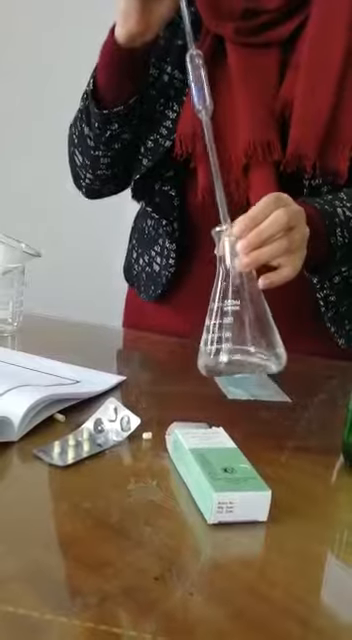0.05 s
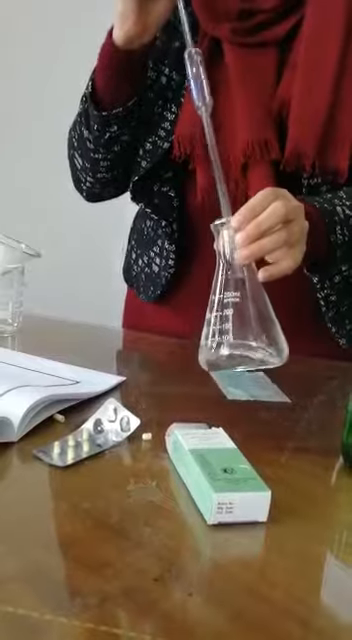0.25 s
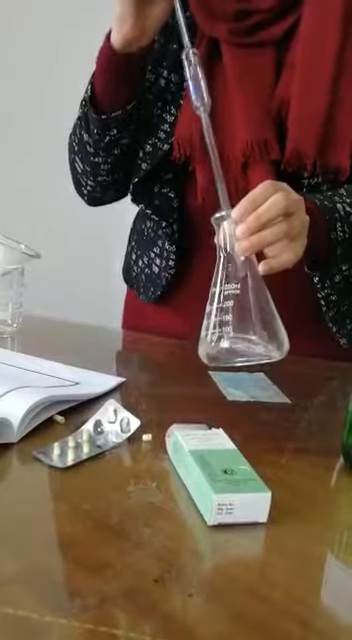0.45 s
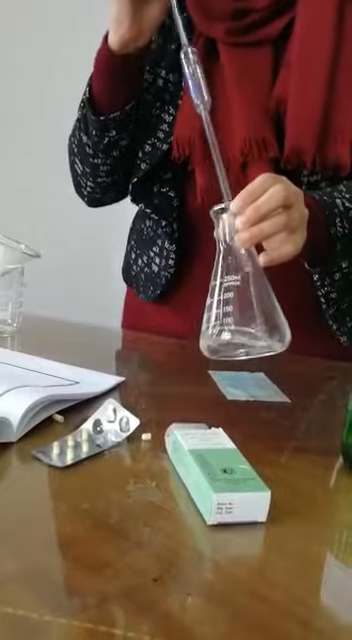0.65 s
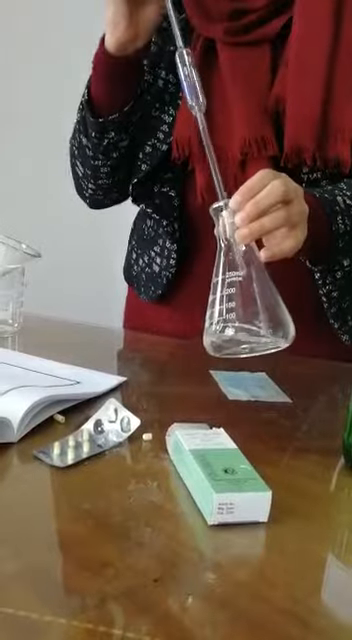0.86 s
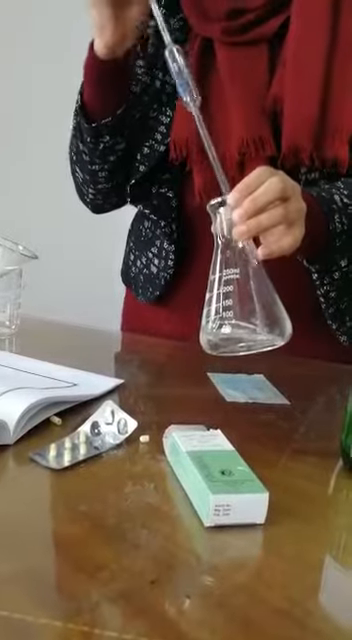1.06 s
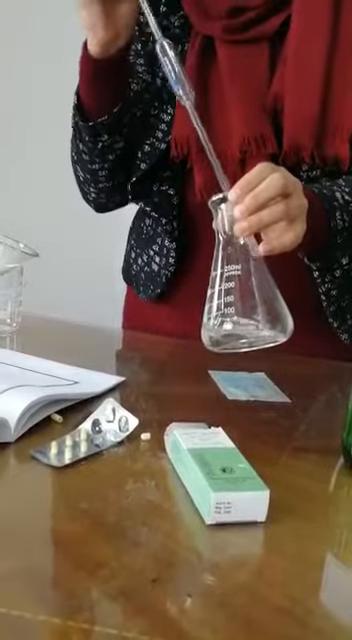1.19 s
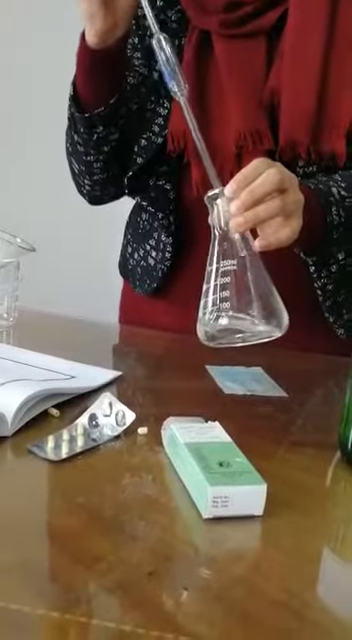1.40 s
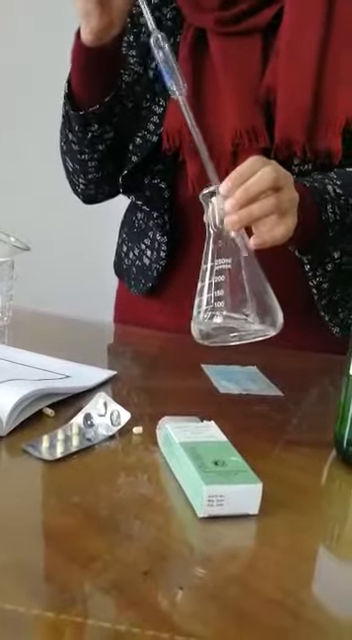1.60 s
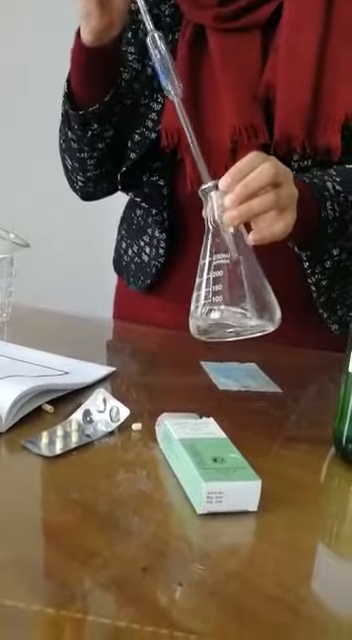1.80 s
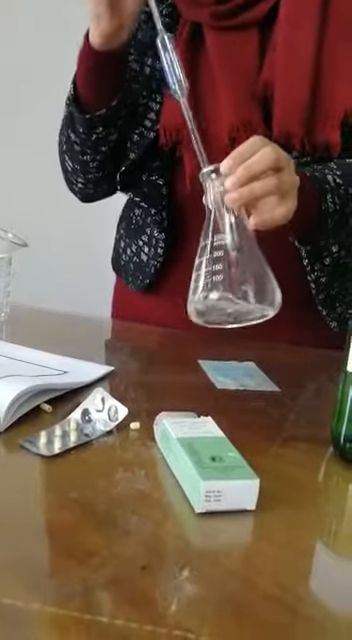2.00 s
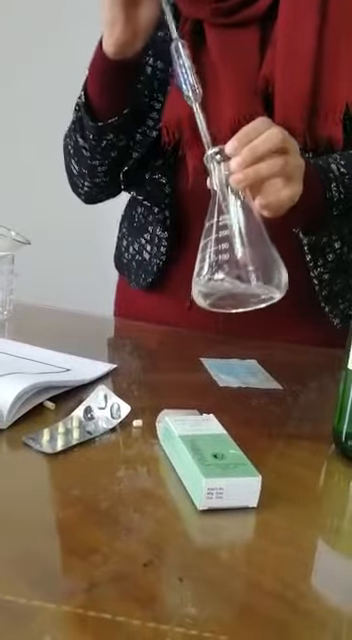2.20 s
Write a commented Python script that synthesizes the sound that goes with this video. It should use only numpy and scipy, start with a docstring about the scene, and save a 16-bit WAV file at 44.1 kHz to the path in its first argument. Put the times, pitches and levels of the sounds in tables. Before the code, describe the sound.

Close to the microphone, a glass pipette taps irregularly inside a glass flask after a light scrape. Each high clink rings briefly in a small lab, with faint hisses between them and ventilation humming underneath.

```python
"""A low ventilation hum fills a small lab. A glass pipette scrapes lightly in the neck of a hand-held
flask, close to a phone, and soft hisses start to come and go. Then the pipette knocks about: each contact
chatters for a moment and rings both glasses, the pipette's pitch shifting with where it touches.
The room answers every clink with a short tail."""
import sys
import numpy as np
from scipy import signal
from scipy.fft import rfft, irfft, next_fast_len
from scipy.io import wavfile

SR = 44100
rng = np.random.default_rng(int(sys.argv[2]) if len(sys.argv) > 2 else 0)


def store_pcm(level_fs):
    """Save levels as 16-bit WAV."""
    pcm = np.round(np.clip(level_fs, -1, 1) * 32767).astype(np.int16)
    wavfile.write(sys.argv[1], SR, np.atleast_2d(pcm).T)


N = 99225


def undb(db):
    """Decibels to gain."""
    return 10 ** (np.asarray(db) / 20)


def unit(x):
    """Scale to rms 1."""
    return x / np.sqrt(np.mean(x ** 2) + 1e-18)


def colour(x, points):
    """Minimum-phase EQ through (freq_hz, gain_db) points."""
    hz, db = np.array(points, float).T
    size = 2 * next_fast_len(len(x) // 2 + 1024)
    f = np.maximum(np.arange(size // 2 + 1) * SR / size, 1)
    gain = undb(np.interp(np.log(f), np.log(np.sort(hz)), db))
    cepstrum = irfft(np.log(gain))
    cepstrum[1:size // 2] *= 2
    cepstrum[size // 2 + 1:] = 0
    return irfft(rfft(x, size) * np.exp(rfft(cepstrum)))[:len(x)]


def fade(t, t60):
    """Hold at 1 until t = 0, then fall 60 dB every t60 seconds."""
    return np.exp(-np.log(1000) * np.maximum(t, 0) / t60)


def late(x, delay_s):
    """Delay a sound on the scene's time line."""
    return np.pad(x, (max(int(delay_s * SR), 0), N))[:N]


def swell(peak_s, length_s):
    """A bell-shaped rise and fall."""
    return np.exp(-2 * ((np.arange(N) / SR - peak_s) / length_s) ** 2)


def ventilation():
    """Low rumble and hum, much alike on both sides, under a thin diffuse hiss."""
    # tone of the moving air: freq_hz, gain_db
    air_eq = [(15, 3.5), (25, -31), (59, -16.5), (111, 1), (175, -9.5), (236, -11), (354, -17.5),
              (394, -27.5), (463, -18), (545, -30.5), (591, -25), (641, -29), (1020, -25.5), (2610, -32.5),
              (6210, -33), (7920, -37.5), (16000, -41.5)]
    # stereo width of the air: freq_hz, side_minus_mid_db
    width_eq = [(25, -8.5), (150, -25), (350, 1), (1000, 0.5), (10000, 0)]
    air_db, hum_db, hum_hz = -58, -74, 120
    mid, side = (undb(air_db) * unit(colour(rng.standard_normal(N), air_eq)) for _ in range(2))
    side = colour(side, width_eq)
    mid = mid + undb(hum_db) * np.sqrt(2) * np.sin(2 * np.pi * hum_hz * np.arange(N) / SR)
    left = colour(mid + side, [(200, .0065), (2000, -.5)])
    right = colour(mid - side, [(200, .018), (2000, .5)])
    return np.array([left, right])


def ring(t, modes, detune=.0004):
    """Decaying glass modes (pitch_hz, level_db, t60_s), each a hair off pitch from blow to blow."""
    out = 0
    for hz, db, t60 in modes:
        pitch_hz = hz * (1 + detune * rng.standard_normal())
        out = out + undb(db) * fade(t, t60) * np.sin(2 * np.pi * (pitch_hz * t + rng.random()))
    return out


def scrapes():
    """The tip drags: dense stick-slip ticks faintly ring the flask."""
    # light strokes of the tip: peak_s, length_s, level_db
    strokes = [(0.002, .012, -42), (.02, .02, -48), (.039, .01, -50), (.075, .02, -56),
               (0.105, 0.016, -41.5)]
    ticks_per_s, ring_db = 2500, -4.5
    t = np.arange(SR // 10) / SR
    pressure = sum(undb(db) * swell(peak_s, length_s) for peak_s, length_s, db in strokes)
    ticks = unit((rng.random(N) < ticks_per_s / SR) * rng.standard_normal(N))
    body = ring(t, [(3100, 4, .03), (3070, 10.5, .02), (6100, -2, .09), (7700, -1, .066),
                    (9500, -3.5, .05), (11260, -11, .039), (13200, -10, .027)])
    return undb(ring_db) * signal.fftconvolve(ticks * pressure, body / np.linalg.norm(body))[:N]


def hisses():
    """Faint swishes of narrow-band noise around the clinks."""
    # soft swishes: peak_s, length_s, level_db, centre_hz, width_hz
    swishes = [(0, 0.096, -54, 3670, 900), (0.145, .09, -63, 5730, 1500), (0.158, .06, -64.5, 3760, 1100),
               (0.773, .05, -58.5, 4700, 1200), (0.824, 0.053, -56.5, 4000, 450),
               (1.245, .03, -66.5, 6350, 600), (1.284, 0.036, -62, 5400, 2000),
               (1.485, 0.055, -61, 4440, 1100), (1.875, .04, -64.5, 5000, 1500),
               (1.92, .05, -65, 4130, 800), (2.245, .025, -66.5, 5270, 900)]
    f, out = np.arange(N // 2 + 1) * SR / N, 0
    for peak_s, length_s, level_db, centre_hz, width_hz in swishes:
        band = irfft(rfft(rng.standard_normal(N)) / (1 + (2 * (f - centre_hz) / width_hz) ** 2), N)
        out = out + undb(level_db) * swell(peak_s, length_s) * unit(band)
    return out


def contact_crack(t, chatter_s, bass_db):
    """Glass meets glass: a sharp tick, and a noisy crack that holds while the contact chatters."""
    # tone of the crack: freq_hz, gain_db
    crack_eq = [(300, -43.5), (800, -30.5), (1300, -26.5), (1900, -24), (2300, -17.5), (2750, 0.5),
                (3300, -8.5), (3850, -1.5), (4550, -5), (5300, -3), (6100, -2), (6550, -10.5), (7900, 7.5),
                (8800, -8), (9400, 11), (9900, -4), (11600, -7), (12600, 0.5), (13600, -4.5), (14300, -1.5),
                (15300, -9), (16000, -26)]
    tick_db = 10
    envelope = fade(t - chatter_s, t60=.037) + undb(tick_db) * fade(t, t60=.0017)
    noise = rng.standard_normal(len(t))
    crack = colour(noise * envelope, crack_eq) / np.std(colour(noise, crack_eq))
    return colour(crack, [(3540, bass_db), (5200, 0)])


def beating(t, hz, db, t60, split_hz=12.5, upper_db=-3):
    """Glass that is not quite round has paired modes: starting opposed, they swell before they fade."""
    phase = 2 * np.pi * (hz * t + rng.random())
    beat = np.pi * split_hz * t
    return undb(db) * fade(t, t60) * (np.sin(phase - beat) - undb(upper_db) * np.sin(phase + beat))


def flask_ring(t, flask_db, belly_db):
    """The flask's bright modes and the beating tone of its wide belly."""
    # flask modes, one list each: pitch_hz, level_db, t60_s
    pitch_hz = [2842, 6090, 6960, 7103, 7790, 7985, 9292, 9402, 9495, 10430, 11160, 12660, 13170]
    level_db = [-11.5, -14.5, -14, -12, -23, -12, -3.5, -2.5, -14, -12, -15, -6.5, -12]
    t60_s = [.12, .05, .08, .09, .04, .1, .05, .08, .09, .045, .08, .018, .055]
    shimmer = ring(t, zip(pitch_hz, level_db, t60_s))
    belly = beating(t, hz=5030, db=-9, t60=.13)
    return undb(flask_db) * shimmer + undb(belly_db) * belly


def pipette_ring(t, pitch_hz, note_db, overtones_db):
    """The pipette's beating main note; some of its other modes partly follow that note's pitch."""
    # other modes with the note at reference_hz, one list each: mode_hz, level_db, t60_s, shift_share
    mode_hz = [1330, 1830, 2250, 3808, 5270, 5455, 7130, 8555, 9165]
    level_db = [-30, -24, -20, -18.5, -16, -9.5, -10, -13.5, -10]
    t60_s = [.025, .025, .025, .05, .06, .08, .06, .07, .06]
    shift_share = [0, 0, 0, 0, .85, .55, 0, .2, .6]
    reference_hz = 3023
    shifted_hz = np.array(mode_hz) * (1 + np.array(shift_share) * (pitch_hz / reference_hz - 1))
    note = beating(t, pitch_hz, db=-12, t60=.14)
    overtones = ring(t, zip(shifted_hz, level_db, t60_s))
    return undb(note_db) * note + undb(overtones_db) * overtones


def ping_and_knock(t, tip_db, knock_db):
    """Quickly damped modes: the tip's high ping and the hollow knock of the hand-held flask."""
    # tip modes, one list each: pitch_hz, level_db, t60_s
    pitch_hz = [5960, 6130, 6350, 6930, 7720, 7990]
    level_db = [2, 3.5, -3.5, -8.5, -10.5, -1]
    t60_s = [.025, .025, .025, 0.018, 0.028, .028]
    # low flask modes: pitch_hz, level_db, t60_s
    knock_modes = [(800, -16, .018), (1580, -17, .016), (1980, -19, .016)]
    ping = undb(tip_db) * ring(t, zip(pitch_hz, level_db, t60_s))
    knock = undb(knock_db) * ring(t, knock_modes)
    attack = 1 - np.exp(-t / .00015)
    return (ping + knock) * attack


def clinks():
    """Each contact cracks and rings both glasses, with its own bass and treble levels."""
    # pipette striking flask: start_s, level_db, flask_db, belly_db, note_db, overtones_db,
    # pitch_hz, tip_db, knock_db, bass_db, treble_db, chatter_s
    contacts = [ (.2216, -18.5, -15, -7, 6, 2, 2978, 6.5, -11, -5, -0.5, .0004),
                (0.2869, -28.5, -0.5, -11, 1, -17, 2970, 7, -12, 12.5, 10, .0015),
                (.3025, -39.5, 2.5, 21, -15, -19, 2980, -25, -20, -5, -4, 0.00063),
                (0.4325, -18.5, -23, -26, 6, 3.5, 3011, 7, -18, -3.5, 2, 0.00084),
                (0.5238, -28.5, -5, 5, -10, -32, 2917, -46, -40, 7, 1.5, .001),
                (0.6259, -24, -6.5, 0.5, 1.5, 7.5, 3078, 10, -7, -2.5, 7, 0.002),
                (1.0020, -19, -1.5, -0.5, -7.5, -20, 2990, -19, -9, 8.5, 4, 0.00021),
                (1.0366, -28.5, 5, 14, -13.5, -12.5, 2960, -2.5, -22, -8.5, 1, 0.0017),
                (1.5038, -23, 8.5, -1.5, 1, -7, 3064, -4.5, -12, 1.5, -0.5, 0.0011),
                (1.6381, -17.5, 2.5, -1, 1.5, -3.5, 3036, -1.5, 0.5, 1.5, 3.5, 0.003),
                (1.7113, -26.5, -1.5, 3, 5, -12, 3080, -3, -25, 8, -1, 0.0018),
                (1.7230, -44.5, 14, 14.5, 17, -6.5, 3020, -1, -24.5, 0.5, -0.5, 0.00059),
                (1.9586, -25.5, -11.5, -5.5, 4.5, 7.5, 3017, -11, -1, 0, 1.5, 0.003),
                (1.9928, -38, 2.5, 12, 17, 6, 3119, 7, -17, 11, 5, 0.0006)]
    t, out = np.arange(SR // 2) / SR, 0
    for (start_s, level_db, flask_db, belly_db, note_db, overtones_db,
         pitch_hz, tip_db, knock_db, bass_db, treble_db, chatter_s) in contacts:
        ringing = flask_ring(t, flask_db, belly_db) + pipette_ring(t, pitch_hz, note_db, overtones_db)
        build_up = 1 - np.exp(-2 * t / chatter_s)  # the ring grows while the glasses chatter
        damped = ping_and_knock(t, tip_db, knock_db)
        crack = contact_crack(t, chatter_s, bass_db)
        clink = colour(ringing * build_up + damped + crack, [(7900, 0), (12500, treble_db)])
        out = out + undb(level_db) * late(clink, start_s)
    low_cut = signal.butter(2, 500, "high", fs=SR, output="sos")  # small glass radiates no bass
    return signal.sosfilt(low_cut, out)


def room(x):
    """Dense wall echoes whose treble dies first."""
    # tone of the lab's reverb: freq_hz, gain_db
    reverb_eq = [(500, -29.5), (1500, -3), (3000, -8.5), (6000, -15), (9500, -14), (14000, -16.5)]
    onset_s = .0099
    t = np.arange(SR * 2 // 3) / SR
    noise = rng.standard_normal(len(t))
    low = signal.sosfilt(signal.butter(1, 7000, fs=SR, output="sos"), noise)
    treble = noise - low
    bloom = 1 - np.exp(-(t / onset_s) ** 2)
    tail = (low * fade(t, t60=.29) + treble * fade(t, t60=.27)) * bloom
    return colour(signal.fftconvolve(x, tail / np.linalg.norm(tail))[:N], reverb_eq)


def scene():
    """The glass faces the left microphone; the right one hears it later, softer and duller."""
    # shading of the direct sound on the right: freq_hz, gain_db
    shade_eq = [(1000, -12), (3000, -15), (4500, -17.5), (6000, -12.5), (9000, -16.5), (14000, -16.5)]
    # tilt of the reverb on the right: freq_hz, gain_db
    right_room_eq = [(1000, 1), (3000, -1.5), (7000, -2), (14000, -7)]
    glass = clinks() + scrapes() + hisses()
    left = glass + room(glass)
    right = late(colour(glass, shade_eq), delay_s=.00058) + colour(room(glass), right_room_eq)
    return np.array([left, right]) + ventilation()


def record(dry):
    """The phone clips at full scale and cuts the top."""
    top_hz = 16000
    high_cut = signal.ellip(8, .2, 70, top_hz, fs=SR, output="sos")
    return signal.sosfilt(high_cut, np.clip(dry, -1, 1))


dry = scene()
out = record(dry)
store_pcm(out)
```